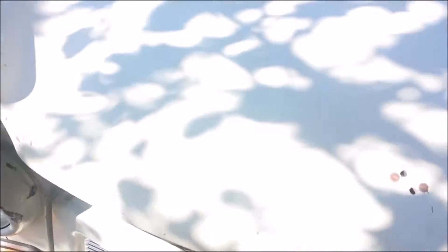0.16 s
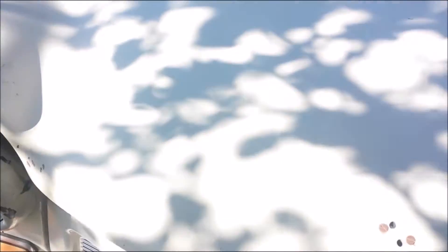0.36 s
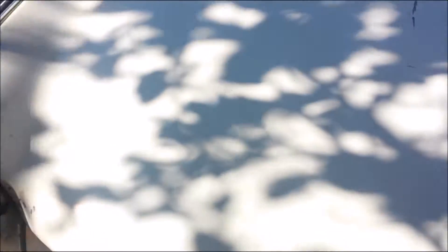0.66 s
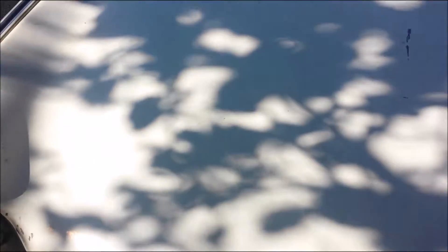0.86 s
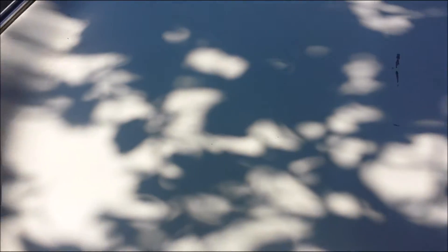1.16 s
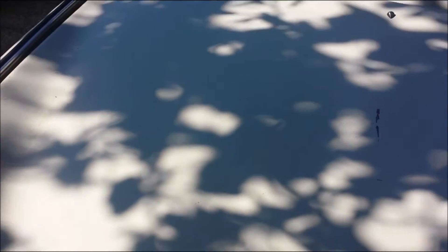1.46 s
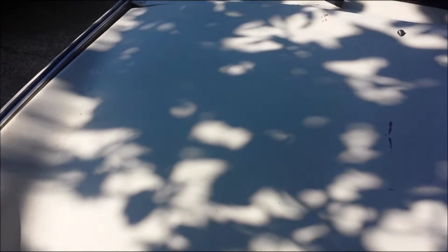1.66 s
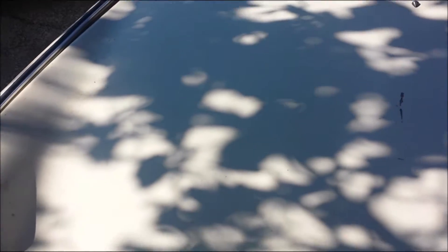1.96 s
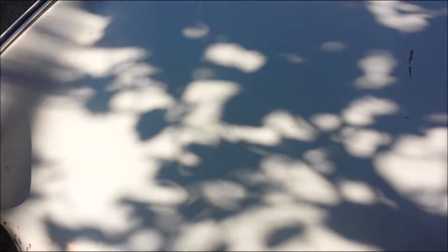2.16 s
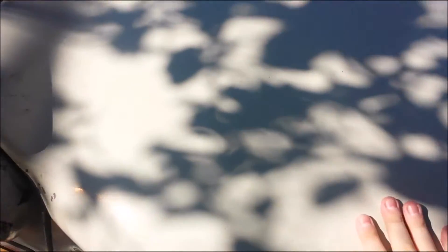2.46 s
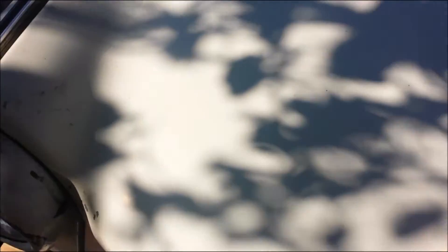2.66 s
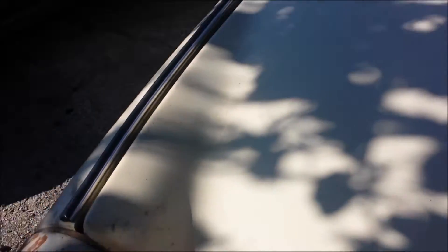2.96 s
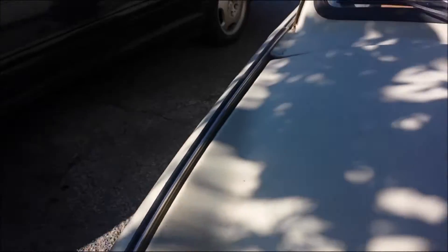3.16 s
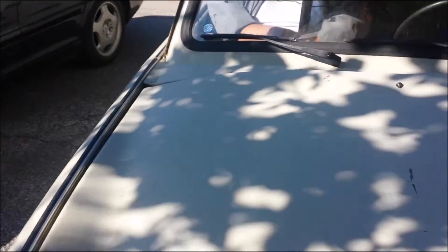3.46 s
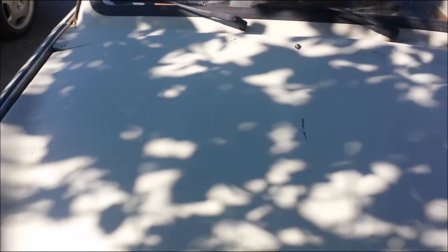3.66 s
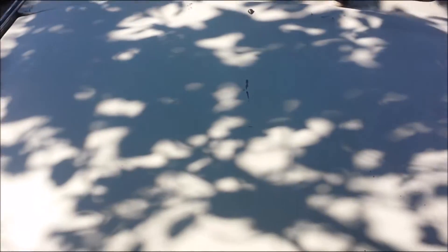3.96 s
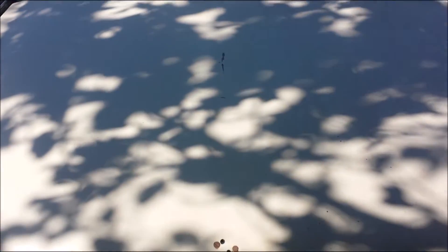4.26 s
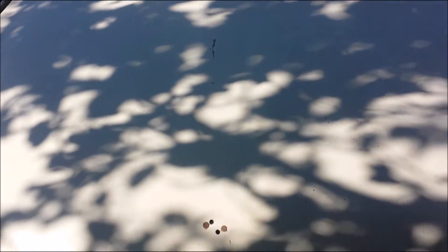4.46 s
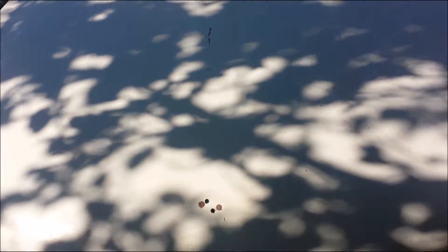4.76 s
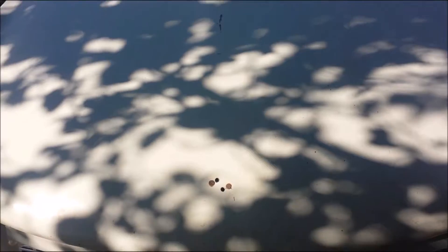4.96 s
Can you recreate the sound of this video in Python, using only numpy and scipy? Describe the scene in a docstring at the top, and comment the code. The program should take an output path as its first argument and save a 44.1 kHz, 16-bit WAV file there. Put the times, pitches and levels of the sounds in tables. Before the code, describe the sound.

A steel car bonnet drops and bounces on its catch with several booming, clanking thunks. It is pushed down with another cluster of knocks, and the catch spring gives a short, scraping squeal. After a pause the bonnet latches with a sharp double clunk. Clothes then rustle and shoes scuff over grit. It is all close to a handheld phone outdoors, over a faint street rumble.

```python
"""An old steel car bonnet drops, bounces on its catch, is pushed down and finally latches, heard outdoors
from close by on a phone's two microphones. Each blow booms in the panel's low modes and clashes in its
dense high ones; under the push the catch spring sticks, slips and squeals.
Then the person steps back: clothes rustle, shoes scuff over grit and fingers tick on the phone.
A faint street rumble lies behind it all."""
import sys
import numpy as np
from scipy import signal
from scipy.fft import rfft, irfft
from scipy.io import wavfile
from scipy.ndimage import uniform_filter1d

SR = 44100
rng = np.random.default_rng(int(sys.argv[2]) if len(sys.argv) > 2 else 0)


def wav_record(signal):
    """Record a signal, one row per channel, as 16-bit PCM in the file named by sys.argv[1]."""
    frames = np.transpose(np.atleast_2d(signal))
    bounded = np.clip(frames, -1, 1)
    # unit amplitude maps onto the largest positive 16-bit level
    quanta = np.round(bounded * 32767).astype(np.int16)
    wavfile.write(sys.argv[1], SR, quanta)


N = 225030
TIME = np.arange(N) / SR
RING = TIME[:2 ** 15]  # time axis of one event [s]
LEFT_RIGHT = np.array([[1], [-1]])


def undb(db):
    """Decibels to gain."""
    return 10 ** (np.asarray(db) / 20)


def unit(x):
    """Scale to rms 1."""
    return x / np.sqrt(np.mean(x ** 2) + 1e-20)


def at_hz(hz, points, values):
    """Read values along a log-frequency axis."""
    return np.interp(np.log(hz + 1e-6), np.log(points), values)


def add(out, s, x):
    """Mix x into out from time s."""
    i = max(int(s * SR), 0)
    out[..., i:i + x.shape[-1]] += x[..., :N - i]


def shape(x, gain):
    """Filter by a gain that is a function of frequency."""
    hz = np.fft.rfftfreq(x.shape[-1], 1 / SR) + 0.0014
    return irfft(rfft(x) * gain(hz), x.shape[-1])


def causal(x, gain):
    """Like shape, but minimum phase: no sound ahead of a hit."""
    cepstrum = irfft(np.log(gain(np.fft.rfftfreq(N, 1 / SR))), N)
    one_sided = cepstrum * (1 + np.sign(np.fft.fftfreq(N)))
    return irfft(rfft(x) * np.exp(rfft(one_sided)), N)


def colour(x, spectrum):
    """Filter by (Hz, dB) points; rms 1."""
    return unit(shape(x, lambda f: undb(at_hz(f, *np.transpose(spectrum)))))


def band(x, hz, octaves):
    """A bell-shaped band of x; rms 1."""
    return unit(shape(x, lambda f: np.exp(-.5 * (np.log2(f / hz) / octaves) ** 2)))


def fade(t60):
    """Exponential decay, 60 dB in t60 seconds."""
    return np.exp(-np.log(1000) * RING / max(t60, 1e-3))


def swell(s, attack_s, hold_s, release_s):
    """Envelope that rises from time s and, after s + hold_s, falls by 1 / e every release_s."""
    rise = np.clip((TIME - s) / attack_s, 0, 1)
    return rise * np.exp(-np.maximum(TIME - s - hold_s, 0) / release_s)


def waver(rate):
    """Glide between random levels, rate of them a second; spread near 1."""
    hold = max(int(SR / rate), 1)
    levels = rng.standard_normal(N // hold + 1)
    return uniform_filter1d(np.repeat(levels, hold)[:N], hold)


# stereo width at the closely spaced microphones: (frequency [Hz], side minus mid [dB])
MIC_SPREAD = [(50, -11.5), (150, -14.5), (350, -14.5), (700, -4.5), (1400, -0.5), (4000, -0.5)]
def side_share(hz):
    """Gain of the side signal relative to the mid."""
    return undb(at_hz(hz, *np.transpose(MIC_SPREAD)))


def noise(size):
    """Noise at the two microphones: alike in the bass, unrelated in the treble."""
    mid, side = rng.standard_normal((2, size))
    side = shape(side, side_share)
    return shape(np.array([mid + side, mid - side]), lambda f: 1 / np.hypot(1, side_share(f)))


def mode(hz, t60):
    """One ringing mode; its phase differs more between the microphones in the treble."""
    skew = rng.standard_normal() * side_share(hz) * LEFT_RIGHT
    return np.sin(2 * np.pi * hz * RING + skew) * fade(t60)


def burst(hz, octaves, t60):
    """A fading band of noise; a narrow one buzzes like a loose part."""
    return band(noise(len(RING)), hz, octaves) * fade(t60)


# low rumble of the street and of handling: (frequency [Hz], spectral level [dB])
RUMBLE_SPECTRUM = [(15, -32.5), (35, -5.5), (110, 0), (230, -8), (350, -9), (800, -23), (1500, -23),
                   (3000, -40)]
def street(handling, rumble_db=-58.5, air_db=-66):
    """A wavering rumble in the distance, joined by the phone's own when moved, and a faint even hiss."""
    waver_db = 1.2 * waver(16)
    strength = np.hypot(undb(rumble_db), handling) * undb(waver_db)
    rumble = colour(noise(N), RUMBLE_SPECTRUM) * strength
    return rumble + undb(air_db) * band(noise(N), 1300, 3.8)


# the person moving, phone in hand:
# (start [s], length [s], relative rustle [dB], handling rumble [dB], rustle left minus right [dB])
MOVEMENTS = [(-.1, 0.41, -49, -44, -5), (0.334, 0.18, -47, -43, -4), (0.703, 0.51, -57.5, -45, -2),
             (1.224, 0.38, -54, -37.5, -3.5), (1.773, 0.54, -62, -51, -2.5),
             (2.295, 0.49, -51.5, -47.5, -6.5), (3.39, 0.3, -61, -80, -6),
             (3.654, 0.059, -43.5, -43.5, -0.5), (3.792, 0.19, -41, -50, 2.5), (3.998, 0.29, -36, -44.5, 0),
             (4.412, 0.24, -43, -43.5, 0), (4.736, 0.53, -45.5, -49, 4.5)]
def motion(attack_s=0.032, release_s=0.092):
    """Envelopes of rustle and handling rumble: every movement swells, holds and dies away."""
    cloth, handling = np.zeros((2, N)), np.zeros(N)
    for s, length, cloth_db, handling_db, pan_db in MOVEMENTS:
        effort = swell(s, attack_s, length, release_s)
        cloth = np.hypot(cloth, effort * undb(cloth_db + pan_db * LEFT_RIGHT / 2))
        handling = np.hypot(handling, effort * undb(handling_db))
    return cloth, handling


# clothes near the microphones: (frequency [Hz], spectral level [dB])
RUSTLE_SPECTRUM = [(300, -6.5), (700, -8), (1800, -10), (2300, -0.5), (3000, -3.5), (6000, -4.5),
                   (10000, -11), (16000, -16.5)]
def rustle(moving, level_db=2.34, grain_db=3, flutter_db=2, surge_db=0.5,
           crackle_per_s=45, crackle_db=15, crackle_t60=0.004):
    """Cloth and soles rub in tiny snags of unequal size; now and then a larger one crackles."""
    sizes = np.minimum(rng.exponential(size=N // 48 + 1), 5.5)
    grains = undb(grain_db * np.repeat(sizes, 48)[:N])  # about 1 ms each
    snags = (rng.random(N) < crackle_per_s / SR) * rng.random(N)
    crackle = undb(crackle_db) * signal.fftconvolve(snags, fade(crackle_t60))[:N]
    rub = noise(N) * (grains + crackle) * undb(flutter_db * waver(110) + surge_db * waver(25))
    return colour(rub, RUSTLE_SPECTRUM) * undb(level_db) * moving


# fingers right beside the right microphone: (time [s], level [dB], centre [Hz], t60 [s])
FINGER_TICKS = [(4.525, -11, 5500, 0.011), (4.5457, -11.5, 4800, 0.013)]
def finger(far_mic_db=-15):
    """Ticks on the phone's case, much louder in the near microphone."""
    out = np.zeros((2, N))
    for s, db, hz, t60 in FINGER_TICKS:
        add(out, s, undb([[db + far_mic_db], [db]]) * burst(hz, 2.6, t60))
    return out


# short hard clicks of the bonnet, the catch and grit underfoot:
# (time [s], relative level [dB], centre [Hz])
HARD_CLICKS = [(.41, -29.5, 8320), (.546, -19, 980), (1.255, -33.5, 10000), (1.387, -18, 4530),
               (1.834, -41, 9200), (2.218, -32.5, 5700), (2.563, -36, 5200), (2.657, -26.5, 3570),
               (3.907, -33, 7000), (3.9429, -19, 2900), (4.004, -20.5, 4630), (4.046, -27, 4700),
               (4.156, -24.5, 6500), (4.418, -24.5, 5500), (4.459, -23.5, 8440), (4.552, -21, 3720)]
# soles scuffing the ground below the phone: (time [s], level [dB], centre [Hz])
SOLE_SCUFFS = [(3.381, -45, 1368), (3.912, -25.5, 4340), (4.109, -24.5, 2620), (4.283, -25.5, 3700),
               (4.478, -26.5, 2580), (4.796, -28.5, 5400), (4.891, -29, 840), (4.912, -28.5, 980)]
# soft footfalls: (time [s], level [dB], centre [Hz])
FOOTFALLS = [(2.249, -44, 98), (4.143, -32.5, 296), (4.341, -31.5, 181)]
# a sole chirping: (time [s], level [dB])
SOLE_CHIRPS = [(4.017, -39), (4.059, -34.5)]
def clicks_and_shoes(click_db=-3, chirp_hz=1010, sole_attack_s=0.00024):
    """Short hard clicks, and the scuffs, pats and chirps of shoes."""
    out = np.zeros((2, N))
    snap = .7 * fade(0.0097) + 3 * fade(.003)  # a short decay under a hard tick
    press = 1 - np.exp(-RING / sole_attack_s)
    for s, db, hz in HARD_CLICKS:
        add(out, s, undb(db + click_db) * snap * band(noise(len(RING)), hz, octaves=0.88))
    for s, db, hz in SOLE_SCUFFS:
        add(out, s, undb(db) * press * burst(hz, octaves=1.0, t60=0.077))
    for s, db, hz in FOOTFALLS:
        add(out, s, undb(db) * press * burst(hz, octaves=0.93, t60=0.32))
    for s, db in SOLE_CHIRPS:
        add(out, s, undb(db) * press * burst(chirp_hz, octaves=0.034, t60=0.31))
    return out


# the catch creaking softly under load: (time [s], level [dB])
CATCH_CREAKS = [(0.688, -42.5), (1.187, -45.5), (1.244, -46)]
# the bands of each creak: (centre [Hz], relative level [dB])
CREAK_BANDS = [(2280, 3), (4400, 4)]
# small metal parts snapping: (time [s], level [dB], centre [Hz])
METAL_PINGS = [(1.362, -13.5, 2666), (1.374, -12.5, 2550), (1.388, -13, 2450), (4.584, -22.5, 2520)]
def fittings(sizzle_db=-35, sizzle_hz=8000, creak_attack_s=0.0032, creak_rough_db=3):
    """The hook sizzles as it slides in under the push; small metal parts creak and tick with a pitch."""
    sizzle = band(noise(N), sizzle_hz, 1.0) * undb(sizzle_db + 2 * waver(450))
    out = sizzle * swell(1.358, attack_s=0.044, hold_s=0.091, release_s=0.016)
    onset = 1 - np.exp(-RING / creak_attack_s)
    for s, db in CATCH_CREAKS:
        creak = sum(undb(db + band_db) * burst(hz, octaves=.13, t60=.2) for hz, band_db in CREAK_BANDS)
        roughness = undb(creak_rough_db * waver(300)[:len(RING)])
        add(out, s, creak * onset * roughness)
    for s, db, hz in METAL_PINGS:
        add(out, s, undb(db) * burst(hz, octaves=0.22, t60=.024))
    return out


# harmonics of the spring's squeal, from the fundamental up: (level [dB])
SQUEAL_HARMONICS = [-17.5, -31, -32.5, -39.5, -46.5]
def spring_squeal(start_s=1.67, hold_s=.028, spring_hz=2190, wander=.009, flutter_db=3, sing_db=-40):
    """The spring squeals while its slips lock to its main mode; set free, it sings on unsteadily."""
    phase = 2 * np.pi * np.cumsum(spring_hz * (1 + wander * waver(300))) / SR
    tone = sum(undb(db + flutter_db * waver(250)) * np.sin(k * phase)
               for k, db in enumerate(SQUEAL_HARMONICS, 1))
    envelope = swell(start_s, attack_s=0.0016, hold_s=hold_s, release_s=0.0088)
    out = np.tile(tone * envelope, (2, 1))
    add(out, start_s + hold_s, undb(sing_db) * burst(spring_hz, octaves=0.019, t60=0.64))
    return out


# modes of the catch and its spring: (frequency [Hz], relative level [dB], t60 [s])
CATCH_MODES = [(1184, -6.5, 0.071), (1368, -2, 0.069), (1622, -8, 0.076), (2150, 4.5, .07), (2350, 1, 0.04),
               (3350, -7.5, 0.062), (3730, -8, 0.06), (3960, -5.5, .06), (4440, -7.5, .07), (5570, -8, .05)]
def catch_ring():
    """The catch's answer to one tap."""
    return sum(undb(db) * mode(hz, t60) for hz, db, t60 in CATCH_MODES)


# the spring sliding in the catch: (time [s], slip rate [1/s], force [dB], unevenness [0-1])
SPRING_SLIDE = [(1.632, 1200, -21.5, 0.26), (1.668, 1130, -16, 0.19), (1.672, 1045, -3, .25),
                (1.692, 1095, -6, .3), (1.698, 646, 8, .47), (1.713, 500, 6, .6), (1.724, 540, -7.5, 0.2),
                (1.772, 370, -29.5, .4)]
def spring_squeak(ring_db=-35, scrape_db=-30, scrape_hz=4000, scrape_t60=0.0069):
    """The spring sticks and slips: first lightly, then in a rough scrape that rings the catch."""
    times, rates, force_db, uneven = np.transpose(SPRING_SLIDE)
    slips, s = np.zeros(N), times[0]
    while s < times[-1]:
        add(slips, s, undb([np.interp(s, times, force_db)]))
        jitter = np.exp(np.interp(s, times, uneven) * rng.standard_normal())
        s += jitter / np.interp(s, times, rates)
    ringing = signal.fftconvolve(slips[None], undb(ring_db) * catch_ring(), axes=1)[:, :N]
    # every slip also tears off a puff of noise, more so when the slips are uneven
    tearing = signal.fftconvolve(slips, fade(scrape_t60))[:N] * (.5 + np.interp(TIME, times, uneven))
    return ringing + undb(scrape_db) * tearing * band(noise(N), scrape_hz, 0.45)


# resonances of the locked latch: (centre [Hz], level [dB], t60 [s])
LATCH_MODES = [(3195, -19.5, 0.13), (4890, -36, 0.52)]
def latch_buzz(octaves=0.037):
    """The latch buzzes on after the last push."""
    return sum(undb(db) * burst(hz, octaves, t60) for hz, db, t60 in LATCH_MODES)


# bending modes of the bonnet: (frequency [Hz], relative level [dB], base t60 [s])
PANEL_MODES = [(69, -13.5, 0.6), (97, -3.5, .5), (108, -3.5, .42), (133.5, -4.5, 0.41), (157.3, -2, 0.41),
               (184, -4, 0.54), (211.7, -3, 0.3), (277.3, -2.5, .33), (318.4, -1, .32), (400.4, -3, .3),
               (450, -6.5, 0.26), (530.7, -6, 0.39), (780, -7.5, 0.17), (945, -7.5, .17),
               (1047, -10.5, .17), (1226, -2.5, 0.14)]
def panel_boom(force, ring_scale, level_db=2, detune=0.0047):
    """The low modes boom; where the blow lands decides the sign and strength of each."""
    out = 0
    for hz, db, t60 in PANEL_MODES:
        strength = rng.choice([-1, 1]) * undb(level_db + db + force(hz) + rng.standard_normal())
        pitch = hz * (1 + detune * rng.standard_normal())
        out = out + strength * mode(pitch, t60 * ring_scale)
    return out


def sheet_ripple():
    """Gain by frequency of the sheet's uneven resonances, the same for every blow."""
    points = np.geomspace(400, 16000, 500)
    peaks_db = np.linspace(3.5, 2.6, len(points)) * rng.standard_normal(len(points))
    return lambda f: undb(at_hz(f, points, peaks_db) * (f > points[0]))


# the crowd of weaker modes in the steel sheet: (frequency [Hz], relative level [dB], base t60 [s])
SHEET_MODES = [(35.6, -29, 0.31), (68.3, -14, 0.71), (150, -8, 0.3), (360, -2, 0.33), (760, -5, 0.32),
               (1570, -5, 0.34), (2650, -1, 0.36), (5650, -2, 0.32), (10000, -4, 0.27), (14000, -9.5, 0.19)]
def sheet_clash(force, ring_scale, ripple, level_db=-4, thud_db=-3, crack_db=4, contact_t60=0.028,
                rattle_db=2.5, yard_db=-27, yard_t60=0.89):
    """Dense modes clash as half-octave noise bands, with a brief crack on contact; the yard answers."""
    points, dbs, t60s = np.transpose(SHEET_MODES)
    crowd = shape(noise(len(RING)), ripple)
    chatter_db = rattle_db * waver(300)[:len(RING)]
    yard = undb(yard_db) * fade(yard_t60)
    out = 0
    for hz in 40 * 2 ** np.arange(0, 8.6, .5):
        bloom = 1 - np.exp(-RING / (.0005 + .55 / hz))  # slow bending waves build up late
        contact = undb(at_hz(hz, [200, 1500], [thud_db, crack_db])) * fade(contact_t60)
        ringing = fade(at_hz(hz, points, t60s) * ring_scale)
        rattle = undb(chatter_db * min(hz / 2000, 1))  # loose metal chatters in the treble
        decay = (ringing + contact) * rattle + yard
        strength = undb(level_db + at_hz(hz, points, dbs) + force(hz))
        out = out + strength * bloom * decay * band(crowd, hz, 1 / 4)
    return out


def blow(force, ring_scale, ripple, catch_db=-9, catch_hz=2600):
    """One blow drives panel and sheet; its force at catch_hz shakes the catch."""
    steel = panel_boom(force, ring_scale) + sheet_clash(force, ring_scale, ripple)
    return steel + undb(catch_db + force(catch_hz)) * catch_ring()


def cushioned_force(force_db, boom_db, dullness, sub_hz=45, sub_db=0.5, boom_hz=109, body_hz=358):
    """Force in dB by frequency: the whole panel flexes near boom_hz; soft contact dulls the treble."""
    bass_db = lambda hz: at_hz(hz, [sub_hz, boom_hz, body_hz], [sub_db, boom_db, 0])
    return lambda hz: force_db + bass_db(hz) - dullness * max(np.log2(hz / body_hz), 0)


def bare_metal_force(peak_db, centre_hz, octaves=0.6):
    """Force in dB by frequency of a metal-on-metal strike: a bell curve around centre_hz."""
    return lambda hz: peak_db - 10 / np.log(10) * (np.log2(hz / centre_hz) / octaves) ** 2


# blows on the bonnet, close to the microphones:
# (time [s], force [dB], extra boom [dB], dullness of contact [dB/octave], ring length [x])
BONNET_BLOWS = [(0.5451, -20.5, 0.5, 3.5, 0.98), (.602, -22.5, -29, 8.5, 0.51), (.705, -34, 9, 4, 2.2),
                (0.7868, -15, 1.5, 2.5, 0.75), (.831, -24.5, 8, 3.5, 1.2), (.879, -14.5, -4, 7, 0.76),
                (.995, -45, 22.5, 4.5, 1.1), (1.06, -41, -2, 7, .6), (1.271, -34, -17, 3.5, 0.14),
                (1.299, -32, -40, 6, 0.33), (1.329, -15.5, -6, 5.5, 0.27), (1.361, -16, -2, 5, 0.55),
                (1.388, -17, 5.5, 6.5, 0.78), (1.673, -30, -3.5, 1.5, 1.11), (2.615, -45, 0.5, 2.5, 5),
                (2.675, -23.5, 0, 8.5, 0.93), (2.7328, -17.5, -12.5, 2, 0.78),
                (2.812, -34, 12.5, 8.5, 0.61), (3.04, -52, 7.5, 2, 0.38)]
# bare metal meeting around the catch: (time [s], force [dB], centre [Hz])
CATCH_STRIKES = [(0.5453, -16, 835), (0.7859, -15, 5620), (0.88, -23.5, 5650), (.882, -16.5, 780),
                 (1.361, -25.5, 2150), (1.388, -24.5, 3020), (2.7322, -17.5, 8000)]
def bonnet(strike_ring_scale=0.58, latch_s=2.735, low_cut_hz=50):
    """The bonnet drops, bounces, is pushed down and latches, striking bare metal on the way."""
    out = np.zeros((2, N))
    ripple = sheet_ripple()
    for s, force_db, boom_db, dullness, ring_scale in BONNET_BLOWS:
        add(out, s, blow(cushioned_force(force_db, boom_db, dullness), ring_scale, ripple))
    for s, db, hz in CATCH_STRIKES:
        add(out, s, blow(bare_metal_force(db, hz), strike_ring_scale, ripple))
    add(out, latch_s, latch_buzz())
    # a panel radiates its slowest motion poorly
    return signal.sosfilt(signal.butter(2, low_cut_hz, "high", fs=SR, output="sos"), out)


# each microphone colours the car differently: (frequency [Hz], left minus right [dB])
MIC_BALANCE = [(60, -5.5), (110, 1), (200, -2.5), (380, -2), (700, 0), (1290, -2.5), (2380, -7.5),
               (4400, 4), (8120, -3), (15000, -14)]
def scene():
    """Outdoors: the bonnet close by, the person at the microphones, the street behind."""
    balance = lambda f: undb(at_hz(f, *np.transpose(MIC_BALANCE)) * LEFT_RIGHT / 2)
    car = causal(bonnet() + spring_squeak() + spring_squeal() + fittings(), balance)
    cloth, handling = motion()
    return car + clicks_and_shoes() + finger() + rustle(cloth) + street(handling)


def record(dry):
    """The phone rounds the loudest peaks and cuts the top above 15.8 kHz."""
    top_cut = signal.ellip(8, .2, 70, 15800, fs=SR, output="sos")
    return signal.sosfilt(top_cut, np.tanh(dry))


dry = scene()
out = record(dry)
wav_record(out)
```